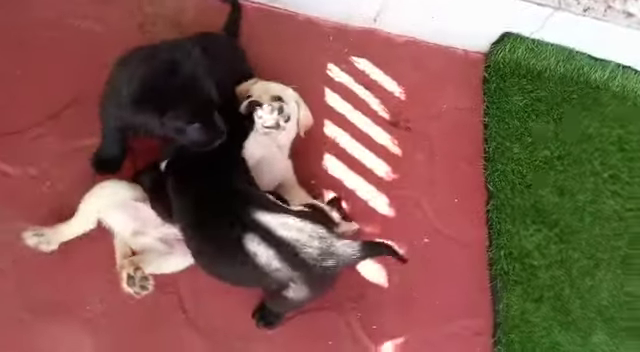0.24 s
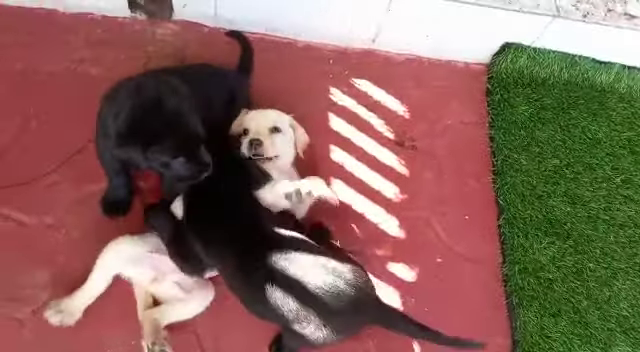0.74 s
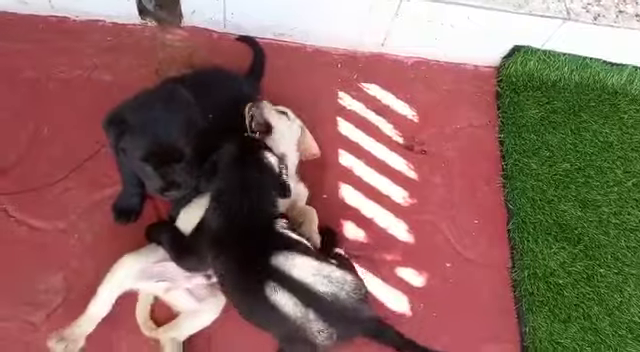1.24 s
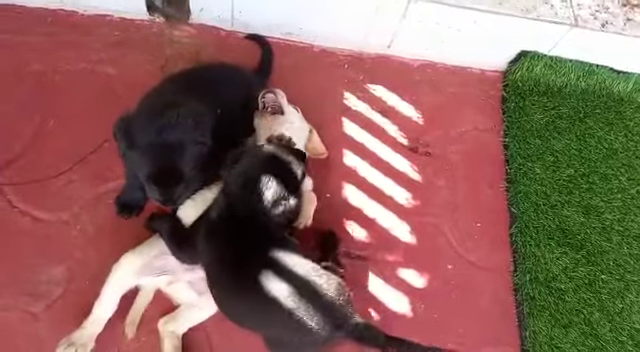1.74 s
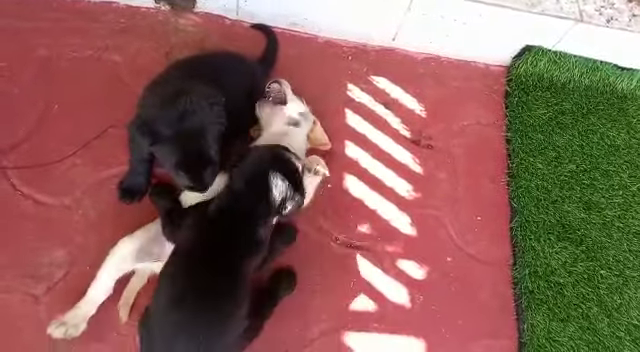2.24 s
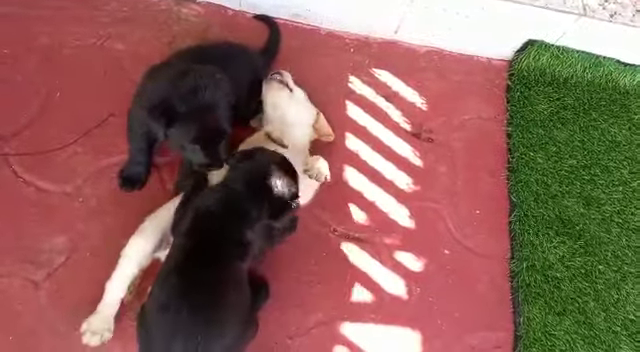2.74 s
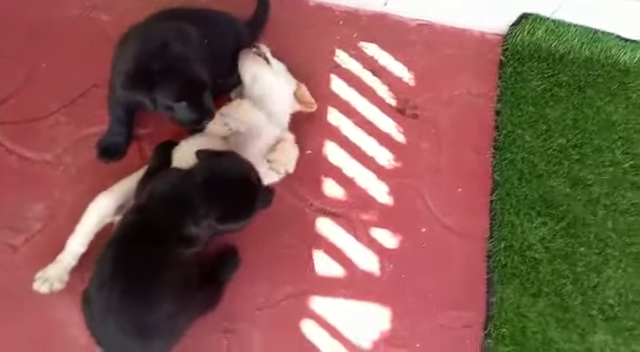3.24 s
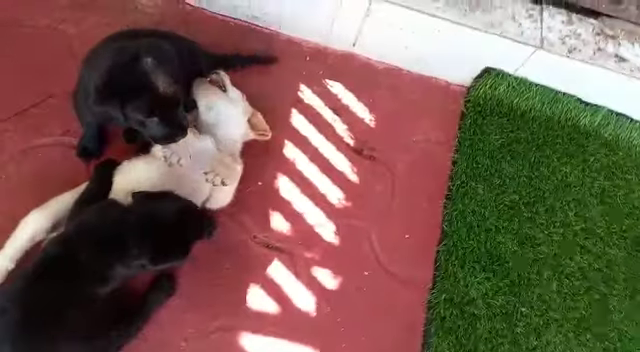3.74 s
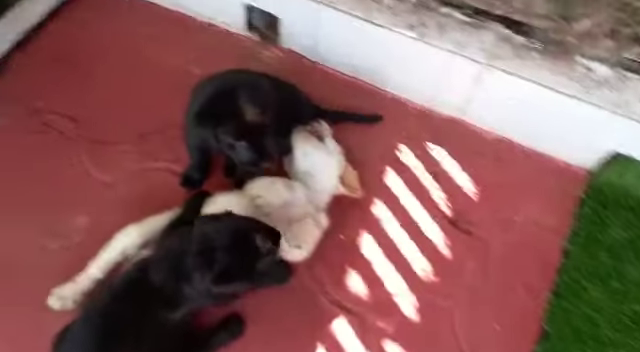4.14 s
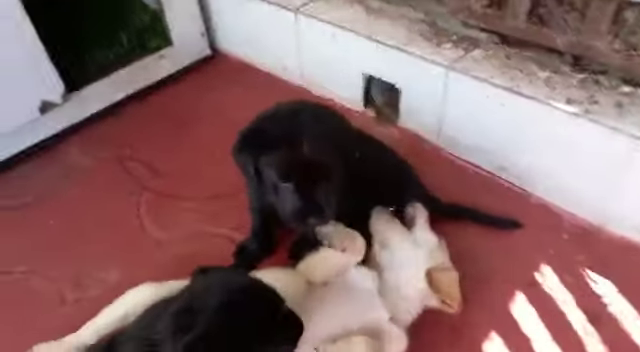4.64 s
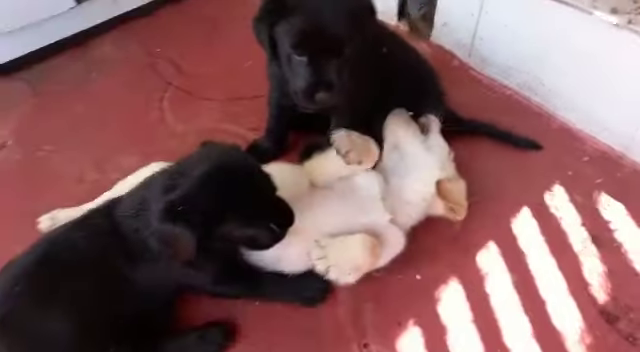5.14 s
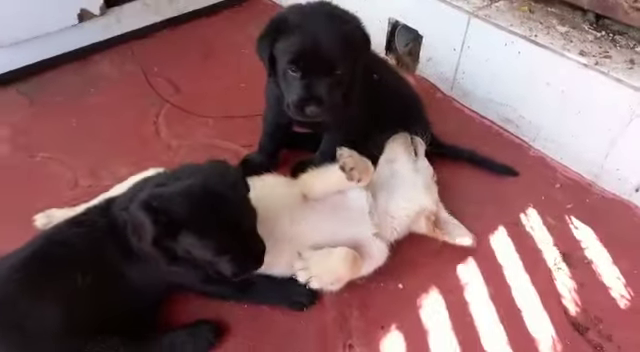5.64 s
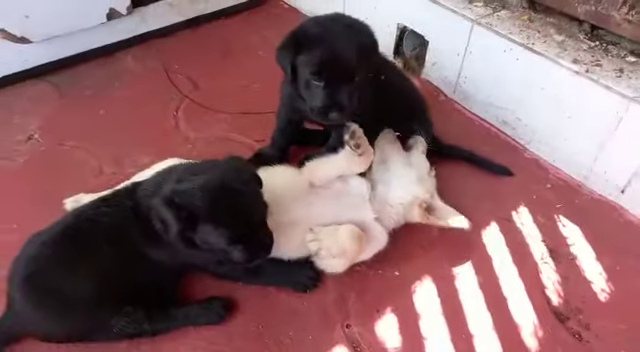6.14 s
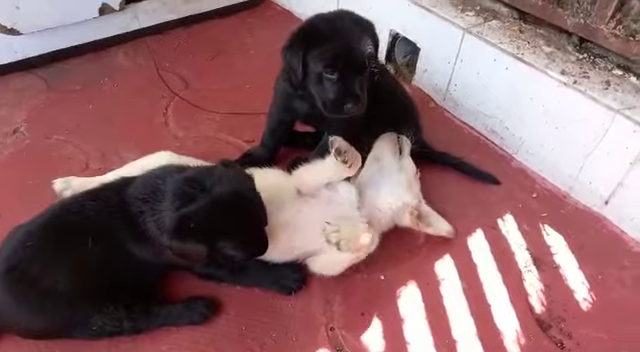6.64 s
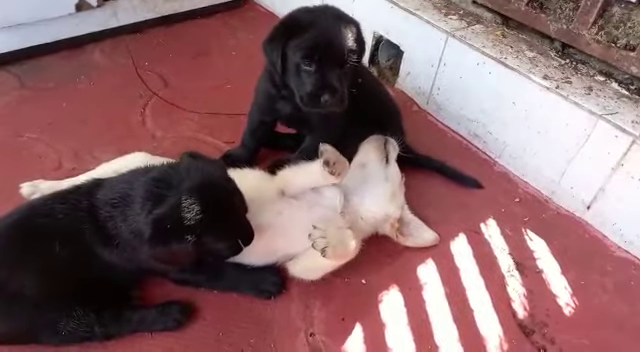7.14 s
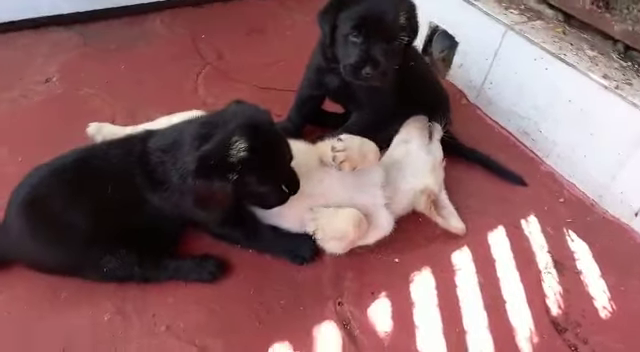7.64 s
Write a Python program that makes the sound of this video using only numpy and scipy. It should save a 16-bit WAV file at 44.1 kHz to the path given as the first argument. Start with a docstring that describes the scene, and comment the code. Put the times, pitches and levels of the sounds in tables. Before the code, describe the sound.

Puppies play-fight close to the microphone in a hard-walled pen with a bright ring of about a second. From 0 to 1.6 s one gives short, nearly pure whistled whines around 2 kHz, several each second, with faint squeals at the start and a brushing stroke at 0.5. At 1.75-1.95 a piercing shriek erupts, by far the loudest moment, with dull body bumps. From 2.1 to 3.2 high strained squeals break downward over rough, low yaps. Hoarse yelping barks follow at 3.4, 3.8, 4.2 and 4.7, with scuffling strongest near 4.4 and a tiny claw tick at 4.65. Quick yaps come at 4.9-5.2, three tiny falling squeaks at 5.3-5.6, and stronger yaps at 5.75-5.9. It eases from 6.1 to 6.8 with a weak yap, whimpers and a soft thump, then yaps and squeals return at 7.0-7.4 and 7.5-7.9 over low rumble.

```python
"""A hard-walled pen, where puppies play-fight on the floor and are heard from close by.
One whines in thin, almost pure notes; then harsh squeals and rough yaps, made of harmonics
and puffs of noise shaped by a throat, overlap and ring round the walls.
Scuffling, brushing and claw ticks are shaped noise, over a faint low rumble that swells at each bump."""
import sys
import numpy as np
from scipy import signal
from scipy.fft import rfft, irfft, next_fast_len
from scipy.io import wavfile
from scipy.ndimage import uniform_filter1d, map_coordinates

SR = 44100
rng = np.random.default_rng(int(sys.argv[2]) if len(sys.argv) > 2 else 0)


def int16_out(signal):
    """Quantize to a 16-bit WAV file."""
    q = np.round(np.clip(np.atleast_2d(signal).T, -1, 1) * 32767)
    wavfile.write(sys.argv[1], SR, q.astype(np.int16))


N = 347508  # length of the scene in samples
TOP_HZ = 15800  # nothing is kept above this


def amp(db):
    """Turn decibels into a gain."""
    return 10 ** (np.asarray(db) / 20)


def unit(x):
    """Scale to an average strength (rms) of 1."""
    return x / np.sqrt(np.mean(x ** 2) + 1e-20)


def along(points, hz):
    """Read (frequency, value) points at any frequency, on a log scale."""
    point_hz, values = np.transpose(points)
    return np.interp(np.log(hz + 1), np.log(point_hz + 1), values)


def curve(rows):
    """Join (time, value) rows into one value per sample."""
    return np.interp(np.arange(N) / SR, *np.transpose(rows))


def wobble(rate, size):
    """Make a smooth random curve with this many random points a second."""
    return map_coordinates(rng.standard_normal(1024), [np.arange(size) * rate / SR], mode="wrap")


def filtered(x, response):
    """Make each frequency of x louder or softer by the given response."""
    size = x.shape[-1]
    padded = next_fast_len(size + 2048)
    spectrum = rfft(x, padded) * response(np.fft.rfftfreq(padded, 1 / SR))
    return irfft(spectrum, padded)[..., :size]


def add(track, s, x):
    """Mix x into the track from time s, which may lie before the start."""
    start = round(s * SR)
    x = x[..., max(0, -start):]
    part = track[..., max(0, start):][..., :x.shape[-1]]
    part += x[..., :part.shape[-1]]


def arch(length, middle_hz, glide, bow):
    """Progress 0-1 through a call, and its pitch: a glide in semitones whose two ends sag by the bow."""
    u = np.linspace(0, 1, int(np.clip(length, .01, .5) * SR))
    semitones = glide * (u - .5) - bow * (2 * u - 1) ** 2
    return u, middle_hz * 2 ** (semitones / 12)


def swell(u, rise, fall):
    """Pressure builds and lets go over these shares of the call."""
    build = np.sin(np.pi / 2 * np.clip(u / rise, 0, 1))
    let_go = np.sin(np.pi / 2 * np.clip((1 - u) / fall, 0, 1))
    return unit(build * let_go)


def ground(spectrum, apart):
    """Stereo noise of rms 1, mid shared by both ears; apart sets how much they differ."""
    mid, side = filtered(rng.standard_normal((2, N)), lambda f: amp(along(spectrum, f)))
    return unit(np.array([mid + apart * side, mid - apart * side]))


def bumps():
    """Strength of the low rumble: a steady bed, and a quick swell that dies away for each bump on the floor."""
    # the steady bed: (time [s], level [dB])
    bed = [(0.0, -67.5), (1.91, -53), (2.06, -66), (3.62, -60), (4.43, -56), (7.88, -53.5)]
    # bodies bump the floor: (time [s], relative level [dB])
    hits = [(.39, -60), (.82, -55), (1.661, -46.5), (1.8, -43.5), (1.89, -47), (2.32, -54), (2.48, -56),
            (2.89, -57), (4.48, -54), (6.38, -52), (6.72, -74), (7.35, -56), (7.66, -53), (7.839, -53)]
    rise_s, t60_s = 0.0088, 0.6  # t60: the time to fade by 60 dB
    power, t = amp(curve(bed)) ** 2, np.arange(SR) / SR
    for s, db in hits:
        fade = amp(db - 60 * t / t60_s)
        add(power, s, (fade * 2 * (1 - np.exp(-t / rise_s))) ** 2)
    return np.sqrt(power)


def rumble():
    """Deep noise whose strength follows the bed and the bumps."""
    # tone of the rumble: (frequency [Hz], relative level [dB per Hz])
    bass = [(15, -64), (25, -37), (85, 9.5), (103, 6.5), (145, 4), (167, -43), (220, 2), (290, -29),
            (480, -120)]
    return bumps() * ground(bass, apart=.5)


def scuffle():
    """Bodies rubbing on the floor: soft noise that rises and falls."""
    # bodies on the floor: (time [s], level [dB])
    strength = [(0, -57.5), (1, -53.5), (1.08, -49), (1.9, -47.5), (2.02, -54), (3.5, -53), (4.4, -44.5),
                (6.8, -53.5), (7.88, -47)]
    # tone of the scuffling: (frequency [Hz], relative level [dB per Hz])
    rustle = [(100, -17), (240, -0.5), (400, -1.5), (800, -9), (2000, -7.5), (6000, -23.5), (15000, -35.5)]
    return amp(curve(strength)) * ground(rustle, apart=0.43)


def brushes():
    """Paws and fur brush the floor: strokes of hiss that start fast and fade slowly."""
    # the strokes: (time [s], length [s], level [dB])
    strokes = [(0.512, 0.29, -51), (1.035, 0.3, -61.5), (3.418, 0.16, -52), (6.47, 0.15, -60)]
    # tone of the hiss: (frequency [Hz], relative level [dB per Hz])
    fur = [(500, -13), (1300, -1.5), (3000, -7), (6000, 13), (7500, -11.5), (11000, -5.5), (15000, -21)]
    strength = np.zeros(N)
    for s, length, db in strokes:
        u = np.linspace(0, 1, int(length * SR))
        add(strength, s, amp(db) * swell(u, rise=0.059, fall=0.89))
    return strength * ground(fur, apart=0.98)


def claws():
    """Claws tick on the floor: noise that fades by 60 dB in 6 ms, with its bass thinned out."""
    # claws on the floor: (time [s], level before the 5 dB cut and the thinning [dB])
    ticks = [(4.646, -27)]
    track, t = np.zeros(N), np.arange(SR // 20) / SR
    for s, db in ticks:
        add(track, s, amp(db - 5 - 60 * t / .006) * rng.standard_normal(len(t)))
    return filtered(track, lambda f: f / (f + 2000))


def pen(x, direct_db, wall_db, tail_db, facing_db=0):
    """The straight path, a quick scatter off the nearest walls and the long ring of the pen."""
    # direction of the straight path: (time [s], delay of the left ear behind the right [samples])
    bearing = [(0, 4.6), (3.8, 6.5), (4.5, 11.4), (7.88, 13.6)]
    # ring of the pen: (frequency [Hz], time to fade by 60 dB [s])
    ring = [(150, 2.17), (700, 0.91), (1400, 1.32), (2200, 1.27), (3100, 1.42), (4200, 0.94), (6500, 0.98),
            (10000, 0.83), (15000, 0.28)]
    # long ring: noise in which each pitch fades at its own speed, starting 10 ms late
    hz, t, bands = signal.stft(rng.standard_normal((2, SR)), SR, nperseg=256)
    fading = bands * amp(-60 * t / along(ring, hz)[:, None])
    tail = signal.istft(fading, SR, nperseg=256)[1]
    tail = np.pad(tail, ((0, 0), (SR // 100, 0)))
    # wall scatter: sparse random echoes that fade by 60 dB in 0.12 s
    age = np.arange(tail.shape[1]) / SR
    sparse = rng.random(tail.shape) < .01
    walls = rng.standard_normal(tail.shape) * sparse * amp(-60 * age / 0.12)
    response = sum(amp(db) * h / np.linalg.norm(h, axis=1, keepdims=True)
                   for db, h in [(wall_db, walls), (tail_db, tail)])
    # straight path: half the delay goes to each ear
    n, lag = np.arange(N), curve(bearing) / 2
    direct = np.array([map_coordinates(x, [n - lag]), map_coordinates(x, [n + lag])])
    to_walls = (x * amp(-facing_db))[None]
    echoes = signal.fftconvolve(to_walls, response, axes=1)[:, :N]
    return amp(direct_db + facing_db) * direct + echoes


def facing(voice):
    """A harder squeal turns to the listener: more comes straight, less goes to the walls [dB]."""
    lift, easy_db, turn_db = 0.2, -32.5, 4  # dB per dB above an easy cry, level of that cry, limit
    level_db = 10 * np.log10(np.abs(uniform_filter1d(voice ** 2, SR // 20)) + 1e-9)
    return np.clip(lift * (level_db - easy_db), -turn_db, turn_db)


def leaning(pair, left_db):
    """Make the left ear louder than the right by left_db; a negative value favours the right."""
    return pair * amp(np.array([[.5], [-.5]]) * left_db)


def whines(overtone_db, jitter):
    """Almost pure whistled notes: a sine with a faint overtone an octave up and a slightly shaky pitch."""
    # thin whines: (time [s], length [s], level before the pen [dB], middle pitch [Hz], glide [semitones])
    thin_notes = [(-.03, 0.082, -36.5, 1644, -2), (0.083, 0.12, -32.5, 1880, 3.5),
                  (0.271, 0.12, -40, 1621, 0.5), (0.417, 0.1, -31, 1883, 6), (0.601, 0.069, -34, 1958, -1),
                  (0.731, 0.066, -32, 2160, 2), (0.826, 0.068, -45, 2164, 2.5),
                  (.895, 0.077, -35.5, 2145, -0.6), (1, 0.076, -39.5, 2175, 0.6),
                  (1.14, 0.0827, -27, 2086, 1), (1.249, 0.043, -38.5, 2085, .3),
                  (1.353, 0.079, -29, 1998, -0.2), (1.447, 0.036, -38, 2005, 0.5),
                  (1.556, 0.083, -26, 2010, 3.1), (1.929, .1, -44.5, 1780, -2.1)]
    bow_share = 0.281  # bow of a whine as a share of its glide
    track = np.zeros(N)
    for s, length, db, middle_hz, glide in thin_notes:
        u, hz = arch(length, middle_hz, glide, bow_share * glide)
        shaky_hz = hz * (1 + jitter * wobble(257, len(u)))
        phase = 2 * np.pi * np.cumsum(shaky_hz) / SR
        tone = unit(np.sin(phase) + amp(overtone_db) * np.sin(2 * phase))
        add(track, s, amp(db) * swell(u, rise=0.9, fall=0.028) * tone)
    return track


def breaking(rows, break_share, head_glide, tail_glide, tail_bright_db, tail_rough, bow):
    """Two notes for each cry: the tail takes over at a set share of the head and sinks."""
    notes = []
    for s, head_s, head_db, head_hz, tail_s, tail_db, tail_hz, rough, bright_db in rows:
        notes.append((s, head_s, head_db, head_hz, head_glide, rough, bright_db, bow))
        notes.append((s + break_share * head_s, tail_s, tail_db, tail_hz, tail_glide,
                      tail_rough * rough, bright_db + tail_bright_db, bow))
    return notes


def alike(rows, glide, rough, bright_db, bow):
    """Notes that share one pitch shape, roughness and brightness."""
    return [(*row, glide, rough, bright_db, bow) for row in rows]


def cries(calls, throat, attack_s, jitter, jitter_rate, flutter_db, flutter_rate, throb_db, slope_db):
    """Strained vocal folds: roughness shakes the pitch and mixes in puffs of air, shaped by the throat."""
    track = np.zeros(N)
    harmonic = np.arange(1, 13)[:, None]
    for s, length, db, middle_hz, glide, rough, bright_db, bow in calls:
        u, hz = arch(length, middle_hz, glide, bow)
        size = len(u)
        rough = np.clip(rough, 0, 1)
        shaky_hz = hz * (1 + jitter * (1 + rough) / 2 * wobble(jitter_rate, size))
        phase = 2 * np.pi * np.cumsum(shaky_hz) / SR
        # higher harmonics are weaker, and none lies above the top
        strength = amp(slope_db * np.log2(harmonic)) * (harmonic * middle_hz < TOP_HZ)
        tone = np.sum(strength * np.cos(harmonic * phase), axis=0)
        # the air comes in puffs, in step with the pitch
        puffs = rng.standard_normal(size) * (1 + 0.79 * np.cos(phase))

        def mouth(f):
            """Throat, a tilt over the first two octaves above the pitch, and little sound below it."""
            tilt_db = bright_db * np.log2(np.clip(f / middle_hz, 1, 4))
            return amp(along(throat, f) + tilt_db) / (1 + (0.57 * middle_hz / (f + 1)) ** 8)

        def gather(f):
            """Turbulence gathers round the lowest harmonics."""
            return amp(2.5 * np.cos(2 * np.pi * f / middle_hz) * np.exp(-f / (4 * middle_hz)))

        air = filtered(puffs, lambda f: mouth(f) * gather(f))
        air_share = .8 * rough ** 2
        voice = np.sqrt(1 - air_share) * unit(filtered(tone, mouth)) + np.sqrt(air_share) * unit(air)
        # fast flutter of the folds on top of the slower throbs of a growl, around 38 a second
        throb = np.sin(2 * np.pi * np.cumsum(38 + 9 * wobble(37.7, size)) / SR)
        shake_db = np.sqrt(rough) * (flutter_db * wobble(flutter_rate, size) + throb_db * throb)
        pressure = swell(u, rise=min(.35, attack_s / length), fall=.25)
        add(track, s, amp(db) * unit(pressure * voice * amp(shake_db)))
    return track


def squeals():
    """The tight throat: shrieks, breaking squeals, whimpers and squeaks."""
    # Levels are before the pen; pitches are those at the middle of a note; roughness is held to 0-1.
    # single shrieks: (time [s], length [s], level [dB], pitch [Hz], glide [semitones], roughness,
    # brightness [dB per octave], bow [semitones])
    shrieks = [(-.03, 0.08, -25.5, 2110, -.5, 0.42, -1, -0.5), (1.75, 0.029, -18, 1800, 7.5, 0.86, 1, -3.5),
               (1.772, 0.08, -9.5, 2259, -1.6, 0, 0, 1), (1.865, 0.073, -16.5, 2080, 0.5, 0.47, 3, 2.7),
               (1.885, 0.22, -28, 3046, -2.5, 0.37, 2.5, 0.3), (2.11, 0.064, -25.5, 3220, 4, 0.65, 0, -1),
               (2.15, 0.25, -21.5, 4190, 0.5, 0.6, 1, -0.5), (2.87, 0.071, -26.5, 3000, 1.2, 1.1, 0, .4),
               (3.405, 0.31, -50.5, 2050, -4, 1.2, -5.5, .5), (5.068, 0.23, -36, 2130, -4.5, 1.1, -3, 1),
               (5.668, .2, -32.5, 3140, -1.5, 0.48, 5.5, 4.5), (5.68, 0.2, -32.5, 4200, 0.1, 0.65, -5.5, 0),
               (7.56, 0.26, -35, 2086, 1.1, 0.94, -0.5, 0)]
    # squeals whose high head drops into a lower tail, at about two thirds of its pitch:
    # (time [s], head length [s], head level [dB], head pitch [Hz],
    # tail length [s], tail level [dB], tail pitch [Hz], roughness, head brightness [dB per octave])
    broken_squeals = [(-.03, 0.13, -27, 3080, 0.084, -28.5, 2143, 0.77, -1),
                      (1.468, 0.07, -25.5, 3110, 0.18, -24.5, 2074, 0.77, 1),
                      (2.27, 0.14, -26.5, 3284, 0.15, -22, 1983, 0.55, 1.5),
                      (2.51, 0.11, -32, 3230, 0.24, -32.5, 2300, 0.85, 3),
                      (2.75, .08, -27, 3193, 0.093, -22, 1905, 0.48, 1),
                      (4.24, .12, -35.5, 3020, .09, -33.5, 2070, 0.54, -0.5),
                      (6.783, 0.069, -33.5, 3180, 0.17, -37, 2060, 0.71, 0.5),
                      (7.235, 0.17, -30.5, 3150, 0.23, -29, 2060, 1, 0),
                      (7.77, 0.071, -25, 3180, 0.089, -25.5, 2156, 0.52, 2)]
    # faint whimpers through a closed mouth: (time [s], length [s], level [dB], pitch [Hz])
    whimpers = [(.21, 0.127, -44, 2775), (.405, 0.082, -45, 3350), (.51, 0.102, -43.5, 3550),
                (.87, 0.101, -54, 3420), (3.19, 0.121, -43.5, 2672), (3.76, 0.17, -50, 3540),
                (4.68, 0.082, -46, 2800), (6.34, 0.118, -53.5, 3260), (6.465, 0.135, -54, 3800),
                (6.55, 0.099, -47, 2680)]
    # a run of tiny falling squeaks: (time [s], length [s], level [dB], pitch [Hz])
    squeaks = [(5.315, 0.056, -26.5, 6150), (5.43, 0.029, -28, 5550), (5.545, .06, -33.5, 4800)]
    # throat and mouth held tight: (frequency [Hz], relative level [dB])
    tight = [(1000, -7), (2100, -14.5), (2550, 3), (3100, 3.5), (3550, -0.5), (4200, 5.5), (5200, 0.5),
             (6300, 4), (7500, -9.5), (10500, -7), (13000, -11.5), (16000, -27)]
    notes = shrieks + breaking(broken_squeals, break_share=.8, head_glide=0.33, tail_glide=-0.66,
                               tail_bright_db=-2.5, tail_rough=0.92, bow=0.421)
    notes += alike(whimpers, glide=-0.26, rough=0.81, bright_db=-12.5, bow=0.19)
    notes += alike(squeaks, glide=-0.76, rough=0.38, bright_db=-0.5, bow=-0.039)
    return cries(notes, tight, attack_s=.03, jitter=0.0279, jitter_rate=350,
                 flutter_db=2.0, flutter_rate=180, throb_db=0.8, slope_db=-7)


def yaps(yap_bow):
    """The open throat: single yaps and breaking barks."""
    # Levels are before the pen; pitches are those at the middle of a note; roughness is held to 0-1.
    # single yaps: (time [s], length [s], level [dB], pitch [Hz], glide [semitones], roughness,
    # brightness [dB per octave])
    single_yaps = [(2.213, 0.13, -22, 561, 1.5, 1.05, 6), (2.323, 0.099, -11.5, 662, 3, 0.48, -1.5),
                   (2.457, 0.25, -22, 634.3, -2.5, 0.96, 2), (2.638, 0.22, -16.5, 662.7, -1, 0.41, -13),
                   (2.83, 0.13, -19.5, 931, -2, 1, 1.5), (3.11, .14, -20, 882, -2.5, 0.58, 4.5),
                   (3.415, 0.14, -26, 949, 1.5, 0.54, 1.5), (4.928, 0.072, -18, 774, 2, 0.24, 7),
                   (5.016, 0.051, -18.5, 798.4, -0.5, 0.42, 8), (5.088, 0.072, -14.5, 962, -0.5, 0.66, 6.5),
                   (5.43, .13, -15.5, 865.5, -2.5, 0.55, 3), (5.738, 0.1, -12.5, 556, 5, 0.4, -5.5),
                   (5.82, 0.096, -14.5, 753, 1.63, 0.47, 0.5), (6.146, .12, -27, 984.4, 0.2, .92, 3.5),
                   (6.986, 0.086, -27, 646, 0, 0.77, 1), (7.043, 0.19, -20, 768, 1, 0.56, 4),
                   (7.83, 0.05, -21, 740, 0.5, 1, 2)]
    # barks that break into a lower tail: (time [s], head length [s], head level [dB], head pitch [Hz],
    # tail length [s], tail level [dB], tail pitch [Hz], roughness, head brightness [dB per octave])
    barks = [(3.815, 0.1, -21.5, 1354, 0.199, -22, 858, 0.71, 4.4),
             (4.158, 0.053, -16, 1430, 0.083, -25.5, 1160, 0.87, 7),
             (4.28, 0.093, -17, 1189, 0.17, -17.5, 738.3, 0.9, 2.9),
             (4.66, .075, -18, 1090, .11, -17, 785.4, 0.94, 0.84),
             (7.21, .07, -18.5, 1178, 0.0852, -16.5, 761.4, 0.56, 9.9),
             (7.52, 0.07, -16.5, 1100, 0.11, -22, 746, 0.98, 3.1)]
    # throat and mouth held open: (frequency [Hz], relative level [dB])
    open_throat = [(200, -18), (400, -5.5), (650, 3), (950, 5.5), (1250, 2.5), (1430, 0.5), (1600, 1.5),
                   (1850, -4.5), (2200, -4), (2900, -17), (4000, -30.5), (6500, -39.5), (12000, -53),
                   (16000, -53)]
    notes = [(*row, yap_bow) for row in single_yaps]
    notes += breaking(barks, break_share=.92, head_glide=-0.44, tail_glide=-1.29,
                      tail_bright_db=4.5, tail_rough=0.96, bow=0.18)
    return cries(notes, open_throat, attack_s=0.024, jitter=0.0447, jitter_rate=300,
                 flutter_db=3.5, flutter_rate=166.7, throb_db=2.0, slope_db=-12.5)


def scene():
    """Three kinds of voice in the pen, over scuffling and rumble."""
    floor = rumble() + scuffle() + brushes() + claws()
    whine = pen(whines(overtone_db=-39, jitter=.003), direct_db=1, wall_db=-7, tail_db=-11)
    squeal = squeals()
    squeal = pen(squeal, direct_db=-11.0, wall_db=3.0, tail_db=-2.5, facing_db=facing(squeal))
    yap = pen(yaps(yap_bow=0.66), direct_db=-5.5, wall_db=-3.0, tail_db=-3.0)
    voices = leaning(whine, left_db=-5.5) + leaning(squeal, left_db=-1.66) + leaning(yap, left_db=-2.5)
    return floor + voices


def record(dry):
    """Round off the highest peaks, then keep nothing above the top frequency."""
    rounded = dry / (1 + np.abs(dry) ** 6) ** (1 / 6)
    return filtered(rounded, lambda f: f < TOP_HZ)


dry = scene()
out = record(dry)
int16_out(out)
```